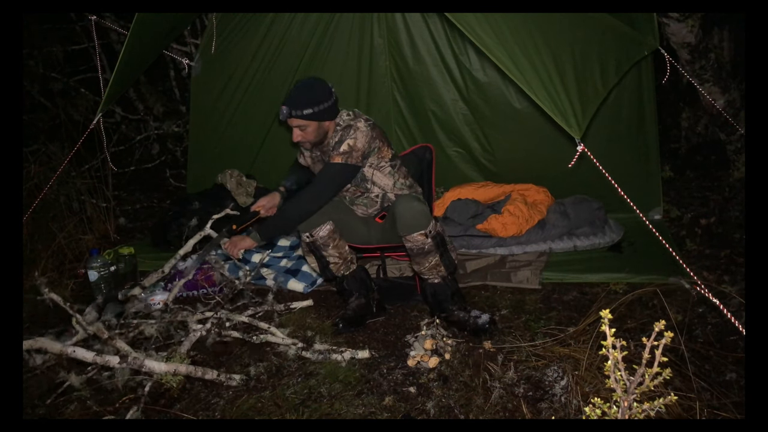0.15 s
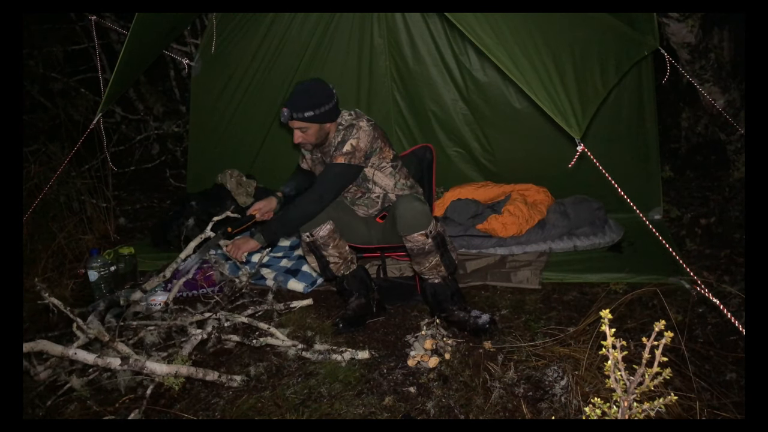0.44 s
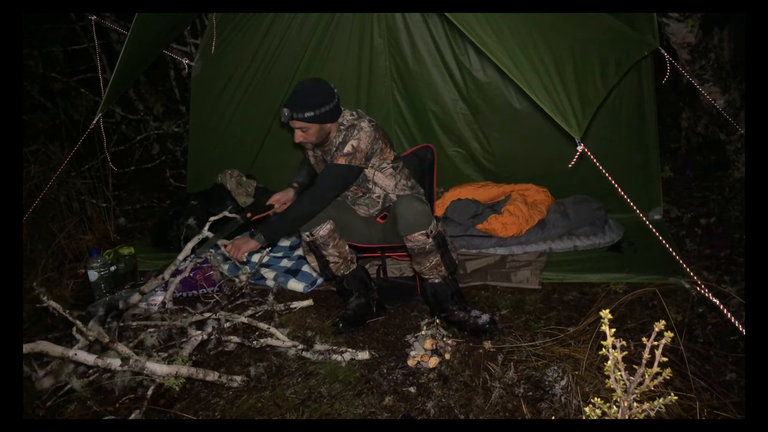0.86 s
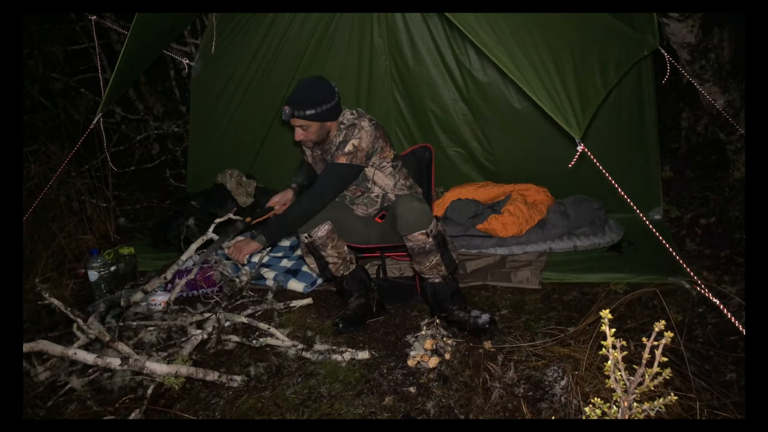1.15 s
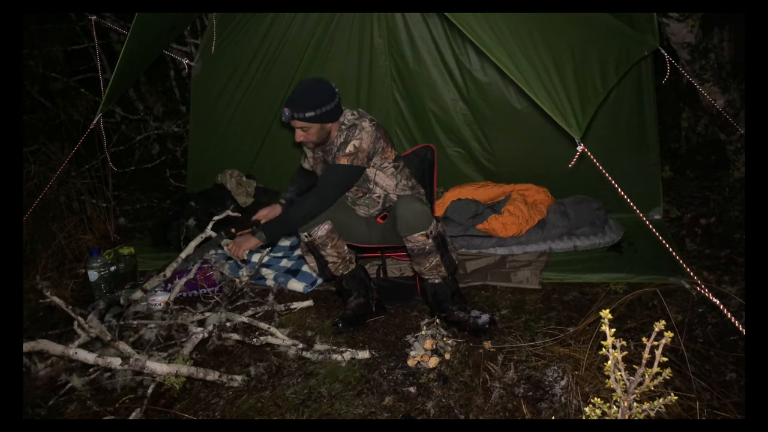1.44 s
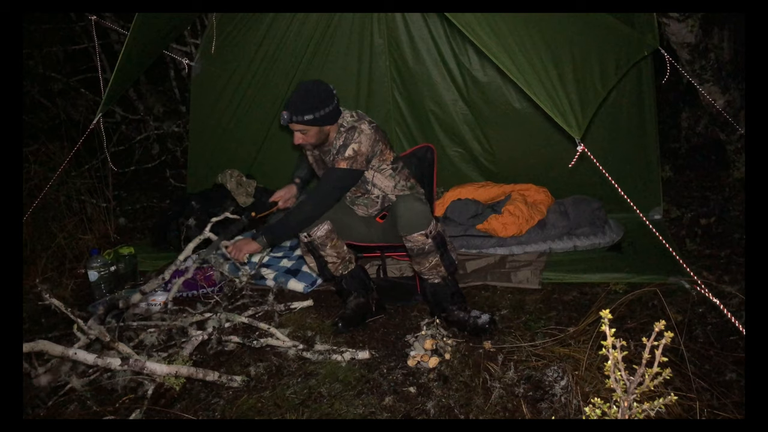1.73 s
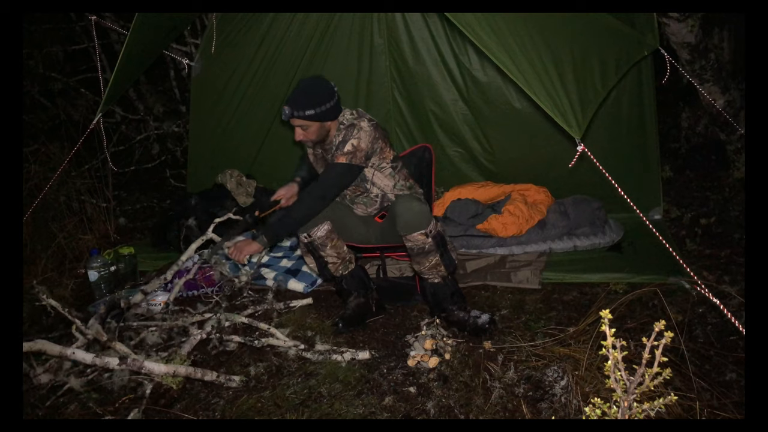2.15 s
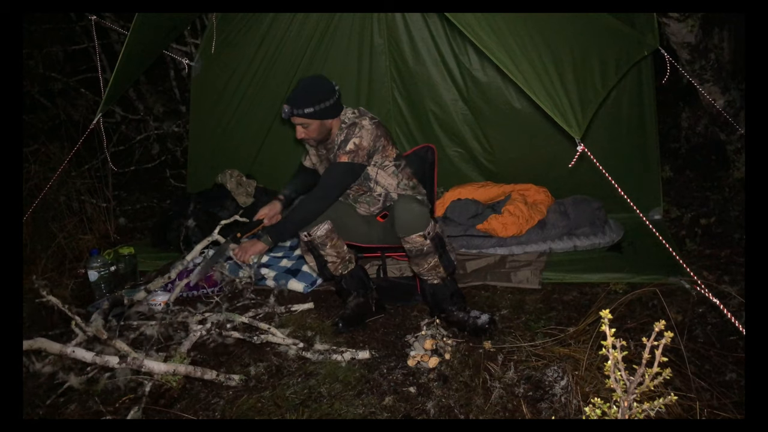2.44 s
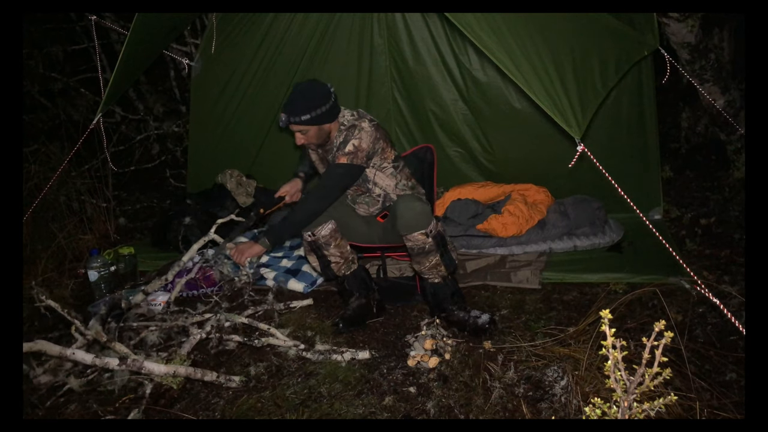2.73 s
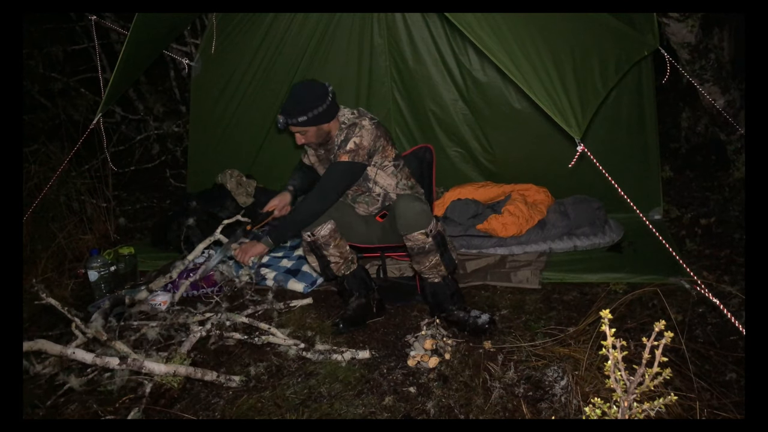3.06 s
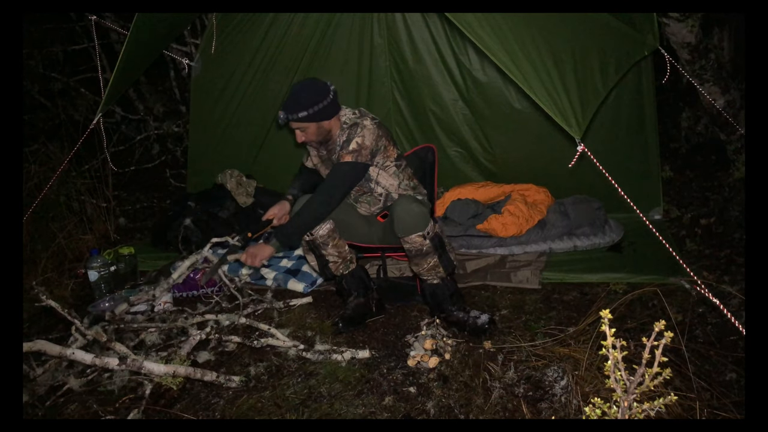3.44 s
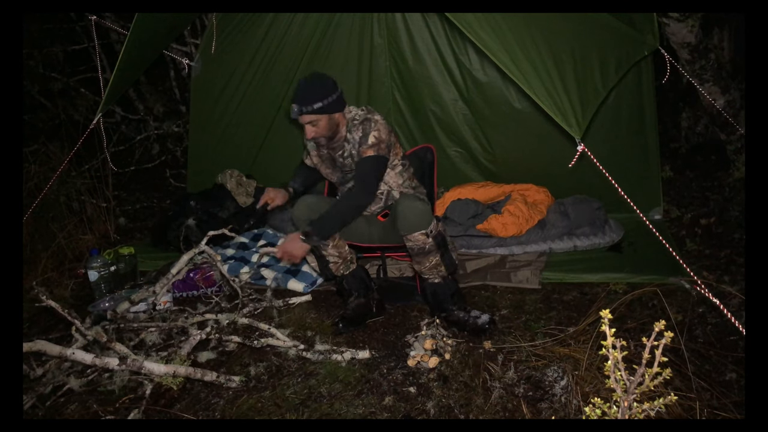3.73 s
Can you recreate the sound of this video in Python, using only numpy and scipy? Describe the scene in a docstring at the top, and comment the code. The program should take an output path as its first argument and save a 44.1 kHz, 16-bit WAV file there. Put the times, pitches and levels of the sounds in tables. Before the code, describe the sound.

A hand saw cuts a dry stick a few metres from the microphone at a quiet camp. Twigs crackle, then quick, rasping push and pull strokes follow with small cracks. Finally the stick snaps sharply and twigs rustle.

```python
"""A quiet night camp, one mono microphone a few metres from a hand saw working through a dry stick.
Twigs rustle, fibres crack, the blade bumps and squeaks, then settles into push and pull strokes.
Each stroke tears a stream of tiny fibres and rings blade and stick. At the end the stick snaps
and twigs rustle again. Ground and tarp give a short reflection, the trees a faint tail."""
import sys
import numpy as np
from scipy import signal
from scipy.fft import rfft, irfft
from scipy.io import wavfile
from scipy.ndimage import uniform_filter1d

SR = 44100
rng = np.random.default_rng(int(sys.argv[2]) if len(sys.argv) > 2 else 0)


def digitize_waveform(pressure):
    """Quantize a signal to 16-bit integers and store it at the path in sys.argv[1].

    Rows of a 2-D input are taken as channels; values are limited to [-1, 1].
    """
    field = np.atleast_2d(pressure).T
    bounded = np.clip(field, -1, 1)
    quanta = np.round(bounded * 32767).astype(np.int16)
    wavfile.write(sys.argv[1], SR, quanta)


N = 171990


def undb(db):
    """Decibels to gain."""
    return 10 ** (np.asarray(db) / 20)


def unit(x):
    """Scale to rms 1."""
    return x / np.sqrt(np.mean(x ** 2) + 1e-20)


def walk(hz):
    """Smooth random wandering with spread near 1."""
    hold = max(int(SR / hz), 2)
    return 0.99 * uniform_filter1d(rng.standard_normal(N)[np.arange(N) // hold], hold)


def low_cut(x, hz):
    """Second-order high-pass."""
    return signal.sosfilt(signal.butter(2, hz, "high", fs=SR, output="sos"), x)


def colour(x, points):
    """Causal filter through (Hz, dB) points that keeps the power of white noise."""
    hz, db = np.array(points, float).T
    size = 4096
    f = np.maximum(np.fft.rfftfreq(size, 1 / SR), 1)
    gain_db = np.interp(np.log(f), np.log(hz), db) - 10 * np.log10(1 + (hz[0] / 2 / f) ** 2)
    cepstrum = irfft(np.log(undb(gain_db)))
    cepstrum[1:size // 2] *= 2  # fold for minimum phase
    cepstrum[size // 2 + 1:] = 0
    response = irfft(np.exp(rfft(cepstrum)))
    return signal.fftconvolve(x, response / np.linalg.norm(response))[:N]


def ring(x, modes, ratio=1):
    """Damped modes (Hz, width in Hz, dB) of alternating sign, keeping the power of white noise."""
    t = np.arange(SR // 10) / SR
    response = 0
    for k, (hz, width, db) in enumerate(modes):
        envelope = undb(db) * width * np.exp(-np.pi * width * t)
        response += (-1) ** k * envelope * np.cos(2 * np.pi * hz * ratio * t)
    return signal.fftconvolve(x, response / np.linalg.norm(response))[:N]


def grains(per_s, spread_db):
    """Random clicks of uneven size, rms 1."""
    size = undb(spread_db * np.minimum(rng.exponential(size=N), 5))
    return unit((rng.random(N) < per_s / SR) * size * rng.choice([-1, 1], N))


def burst(start, decay, click=0):
    """A dying spray of noise, starting near rms 1, with an optional first click."""
    t = np.arange(SR // 10) / SR
    spray = rng.standard_normal(len(t)) * np.exp(-t / decay)
    spray[0] += click
    spray *= np.sqrt(decay * SR / 2) / np.linalg.norm(spray)
    return np.pad(spray, (max(int(start * SR), 0), N))[:N]


def night_air():
    """Still air around the camp: a faint, low, steady hush."""
    # Spectrum of the air. Each row: frequency in Hz, level in dB.
    hush = [(45, -5.5), (80, 0), (170, -1.5), (500, -8), (1000, -9.5), (1600, -16.5), (8000, -21),
            (16000, -27)]
    return undb(-75.5) * colour(rng.standard_normal(N), hush)


def rustle():
    """Twigs and sleeves crackle unevenly as the stick is handled."""
    # Swell of the handling. Each row: time in seconds, level in dB.
    handling = [(0, -70.5), (.12, -66), (.21, -62), (.31, -73), (.5, -75.5), (.85, -89), (1.8, -78),
                (2.05, -58), (2.301, -68.5), (2.84, -70.5), (3.029, -63), (3.32, -73), (3.38, -53.5),
                (3.482, -59.5), (3.515, -48.5), (3.559, -61), (3.731, -65), (3.78, -80.5)]
    # Spectrum of twigs and cloth. Each row: frequency in Hz, level in dB.
    spectrum = [(35, -43), (60, -2), (380, -2.5), (458, 0.5), (882, -3.5), (2840, -2), (4120, -5.5),
                (7750, -3.5), (16000, -10.5)]
    db = np.interp(np.arange(N) / SR, *np.array(handling).T) + 3.07 * walk(hz=59.8)
    return colour(grains(per_s=3800, spread_db=3.5) * undb(db), spectrum)


def cracks():
    """Each fracture throws a bright spray of splinters and rings the wood."""
    # Fibres giving way, the last ones as the stick breaks.
    # Each row: start in seconds, level in dB, decay in seconds, wood ring relative to that level in dB.
    fractures = [ (0.0986, -41, 0.0062, -2), (.1432, -43.5, .003, -6), (0.17, -48, .0015, -2),
                 (.2355, -50, .003, -5), (.350, -53.5, 0.0085, -5.5), (0.429, -58.5, .005, -9),
                 (0.9356, -34, 0.0016, -23), (0.9504, -34, .0017, -8), (1.149, -52, 0.0034, -9),
                 (1.387, -47, .004, -24), (1.488, -43.5, .003, -17), (1.516, -54, 0.0079, 0),
                 (1.802, -60, 0.0096, -12), (1.865, -47, .005, -8.5), (1.903, -30, 0.00082, -22),
                 (1.9117, -33.5, 0.00074, -19), (1.9141, -28.5, 0.00098, -32), (2.371, -45.5, 0.0084, -21),
                 (2.572, -40, .003, -9.5), (2.587, -45, 0.0034, -14), (2.6104, -37, 0.0014, -27),
                 (3.3323, -30.5, 0.0023, -10.5), (3.359, -17, 0.0024, 1), (3.4326, -24.5, 0.00095, -9),
                 (3.4338, -15.5, 0.00037, -9), (3.4438, -37.5, 0.0069, -7)]
    # Spectrum of the splinters. Each row: frequency in Hz, level in dB.
    spectrum = [(450, -18.5), (850, -5.5), (1800, -8.5), (3000, 0.5), (5500, 2.5), (9500, 2.5), (11500, -2),
                (16000, -4)]
    # Resonances of the cracking wood. Each row: frequency in Hz, width in Hz, level in dB.
    wood_modes = [(1090, 140, -6), (1355, 130, -2.5), (2050, 400, -9), (2600, 170, 2.5), (3006, 140, 4),
                  (3500, 160, -4.5), (4595, 220, -2), (5650, 280, -3)]
    splinters, kicks = np.zeros((2, N))
    for start, db, decay, ring_db in fractures:
        spray = undb(db) * burst(start, decay, click=1.8)
        if decay < .0019:  # the briefest cracks are all treble
            spray = low_cut(spray, hz=4200)
        splinters += spray
        kicks[int(start * SR)] += undb(db + ring_db) * np.sqrt(decay * SR / 2)
    wood = low_cut(ring(kicks, wood_modes), hz=790)  # a thin stick radiates little bass
    return colour(splinters, spectrum) + wood


def bumps():
    """Soft knocks as the blade is set down or jams at a turn."""
    # Blade against stick. Each row: start in seconds, level in dB, decay in seconds.
    knocks = [(.146, -54, 0.011), (.172, -49.5, 0.0048), (0.235, -51, 0.0047), (0.993, -56, 0.0087),
              (1.494, -56.5, 0.011), (1.994, -47, 0.01), (3.451, -53.5, 0.014)]
    # Dull spectrum of a knock. Each row: frequency in Hz, level in dB.
    spectrum = [(60, -6), (150, -1), (240, -2), (450, -6.5), (650, 0.5), (950, -12), (2000, -16),
                (8000, -39)]
    return colour(sum(undb(db) * burst(start, decay) for start, db, decay in knocks), spectrum)


def squeaks():
    """Steel or bark sticks and slips on the wood in brief, rough, rising glides."""
    # The squeaks. Each row: start in seconds, level in dB, first and last pitch in Hz.
    glides = [(.2, -60, 1900, 2300), (1.016, -64, 1800, 2400)]
    length_s = .022
    t, out = np.arange(N) / SR, 0
    waver = 1 + .08 * walk(hz=SR / 20)
    for start, db, from_hz, to_hz in glides:
        travel = np.clip((t - start) / length_s, 0, 1)
        hz = (from_hz + (to_hz - from_hz) * travel) * waver
        out += undb(db) * np.sin(np.pi * travel) * np.sin(2 * np.pi * np.cumsum(hz) / SR)
    return out


def sawing():
    """The blade speeds up and slows in each stroke; teeth purr, torn fibres rasp and ring stick and steel."""
    # Blade strokes. Each row: start and length in seconds, level in dB, loudest point from 0 to 1,
    # sag half a stroke from there in dB, relative stick ring in dB, top tooth rate in Hz, push 1 or pull 0.
    strokes = [ (0.522, 0.2514, -51, 0.42, 17, -12, 230, 1), (0.91, 0.16, -55.5, 0.24, 3.5, -12.5, 260, 0),
               (1.129, .189, -47, 0.46, 14, -14.5, 250, 1), (1.364, 0.1538, -53, 0.51, 12.5, -12.5, 360, 0),
               (1.545, .206, -47.5, .43, 22, -14, 250, 1), (1.856, .17, -52.5, 0.38, 6, -13.5, 300, 0),
               (2.071, 0.2168, -48.5, 0.42, 16.5, -13, 310, 1),
               (2.352, 0.1685, -51, 0.5, 12, -14.5, 400, 0), (2.502, 0.29, -53, 0.5, 9, -12.5, 260, 1),
               (2.867, 0.2, -52.5, .36, 11.5, -11.5, 190, 0), (3.096, .202, -52, .34, 10, -13.5, 320, 1)]
    # Rasp of each direction, before the bass shelf. Each row: frequency in Hz, level in dB.
    push_rasp = [(90, -5), (200, 0.5), (900, -5.5), (1700, -10), (3400, -2), (6200, -3), (7500, 1),
                 (10500, -3), (13000, -4.5), (16000, -7.5)]
    pull_rasp = [(90, -1.5), (250, 0), (1000, -3), (1900, -5), (3100, 2), (5800, 0), (7500, 3),
                 (11000, -2.5), (16000, -9.5)]
    # Resonances of the held stick and the blade. Each row: frequency in Hz, width in Hz, level in dB.
    stick_modes = [(233, 143, -6), (670, 46, 3), (1148, 69, -5), (1520, 100, -3.5)]
    blade_modes = [(3170, 190, -3), (3720, 230, 0), (4850, 220, 1), (7350, 400, -1)]
    bite_s, release_s, ring_lag_s = 0.016, 0.031, 0.015
    fibres_per_s, spread_db, chatter_hz = 7800, 2.5, 200.4
    shelf_db, shelf_hz = -5.5, 1100
    turn_speed, tooth_jitter, tooth_grip = .4, 0.089, 0.19  # shares of top speed, tooth rate, fibre level
    t, out = np.arange(N) / SR, 0
    # The stick rings higher on the pull.
    for direction, rasp, mode_ratio in ((1, push_rasp, 1), (0, pull_rasp, 1.12)):
        tearing, ringing, tooth_hz = np.zeros((3, N))
        for start, length, db, loudest, sag_db, ring_db, top_hz, push in strokes:
            if push == direction:
                travel = np.clip((t - start) / length, 0, 1)
                contact = np.clip(np.minimum((t - start) / bite_s, (start + length - t) / release_s), 0, 1)
                effort = contact * undb(db - sag_db * (2 * (travel - loudest)) ** 2)
                tearing += effort
                ringing += undb(ring_db) * np.interp(t - ring_lag_s, t, effort)
                speed = turn_speed + (1 - turn_speed) * np.sin(np.pi * travel)
                tooth_hz += (contact > 0) * top_hz * speed
        tooth_hz *= 1 + tooth_jitter * walk(chatter_hz)
        teeth = np.sin(2 * np.pi * np.cumsum(tooth_hz) / SR)
        chatter = undb(1.77 * walk(chatter_hz))
        fibres = unit(grains(fibres_per_s, spread_db) * chatter * (1 + tooth_grip * teeth))
        shelved_rasp = [(hz, db + shelf_db / (1 + (hz / shelf_hz) ** 2)) for hz, db in rasp]
        stick = ring(fibres * ringing, stick_modes, mode_ratio)
        purr = undb(-4.5) * teeth * chatter * ringing
        blade = undb(-5) * ring(grains(fibres_per_s, spread_db) * chatter * tearing, blade_modes)
        out += colour(fibres * tearing, shelved_rasp) + stick + purr + blade
    return out


def campsite(x):
    """A quick scatter from tarp and ground, then a faint tail from the trees."""
    delay_s, tarp_decay_s, trees_t60_s = 0.0067, 0.0079, 0.37
    t = np.arange(SR // 2) / SR
    tarp = rng.standard_normal(len(t)) * np.exp(-t / tarp_decay_s)
    trees = rng.standard_normal(len(t)) * np.exp(-np.log(1000) * t / trees_t60_s)
    response = undb(-14.5) * tarp / np.linalg.norm(tarp) + undb(-21.5) * trees / np.linalg.norm(trees)
    return x + signal.fftconvolve(x, np.pad(response, (int(delay_s * SR), 0)))[:N]


def scene():
    """The work on the stick from a few metres off, over night air, the same in both channels."""
    mono = campsite(sawing() + cracks() + bumps() + rustle() + squeaks()) + night_air()
    return np.array([mono, mono])


def record(dry):
    """The recorder thins the deep bass and cuts the top above 16 kHz."""
    top_cut = signal.ellip(10, .2, 80, 16000, fs=SR, output="sos")
    return signal.sosfilt(top_cut, low_cut(dry, hz=55))


dry = scene()
out = record(dry)
digitize_waveform(out)
```